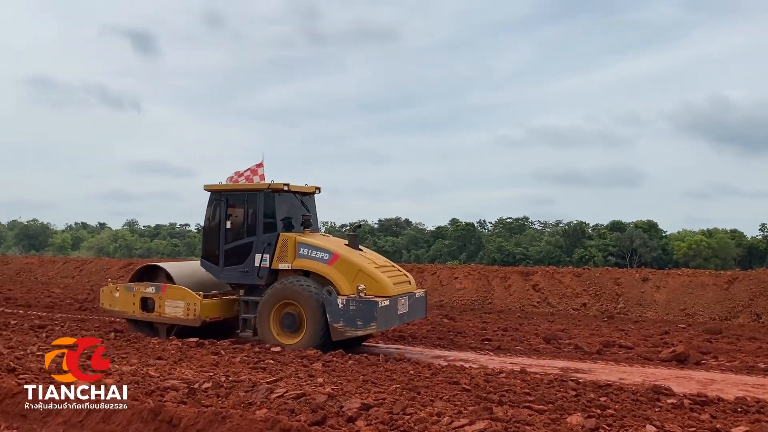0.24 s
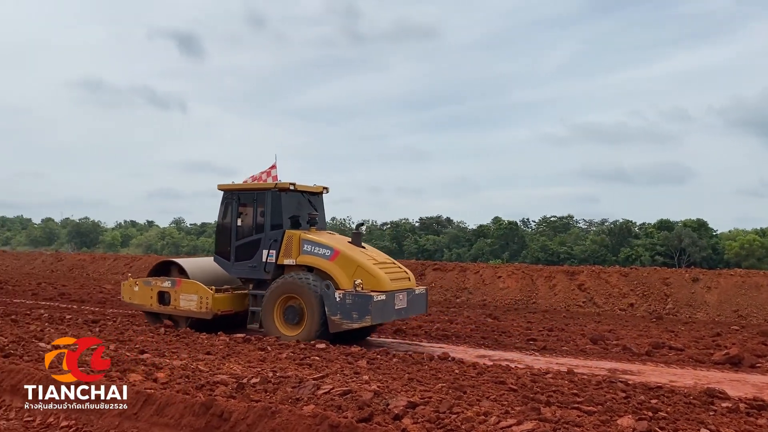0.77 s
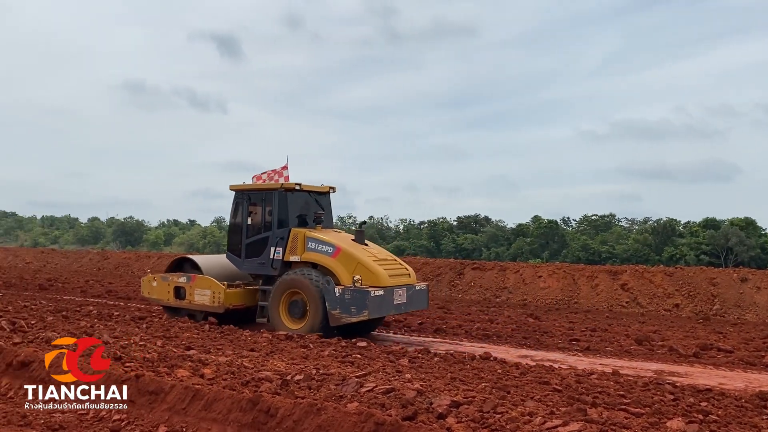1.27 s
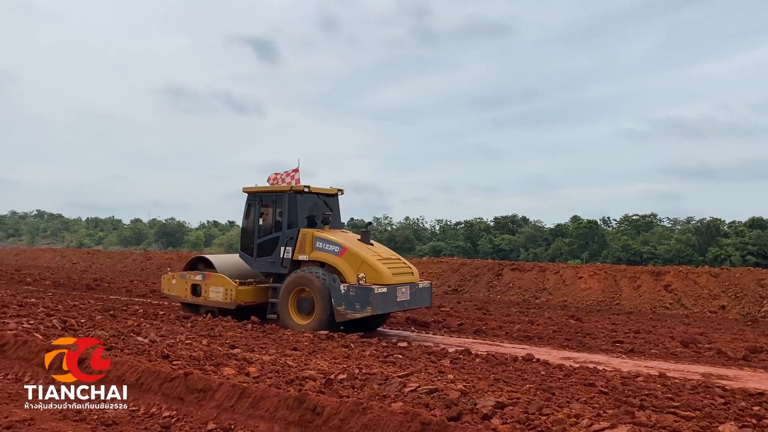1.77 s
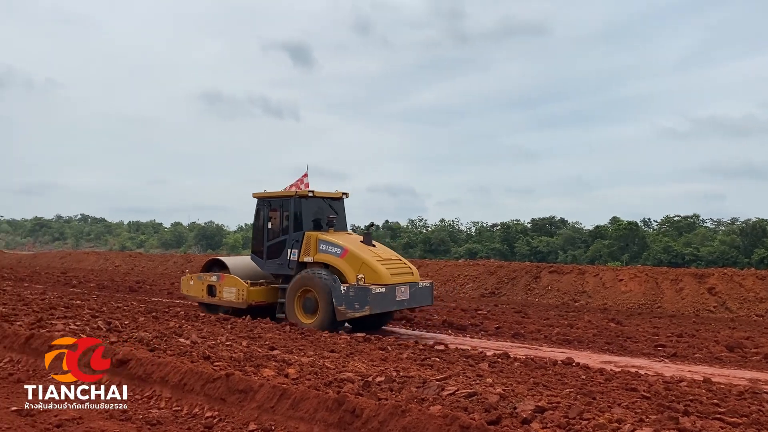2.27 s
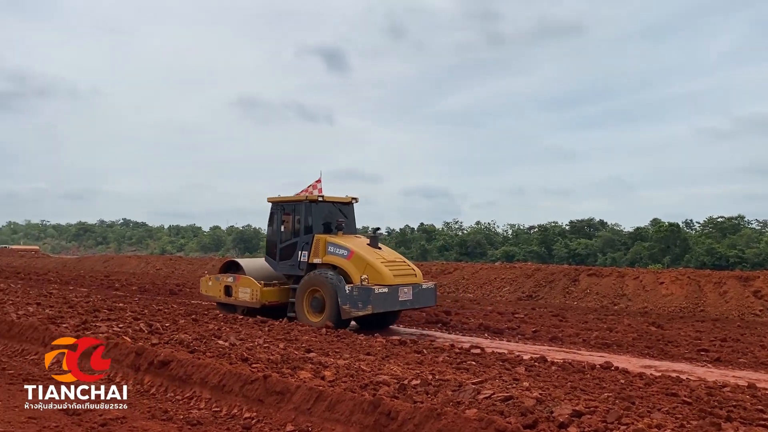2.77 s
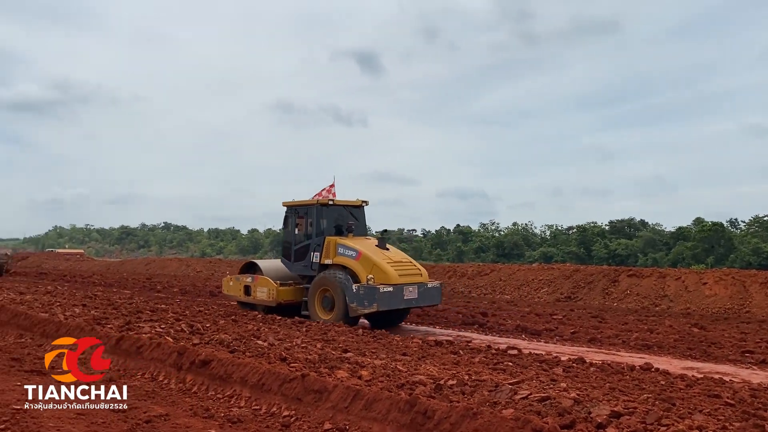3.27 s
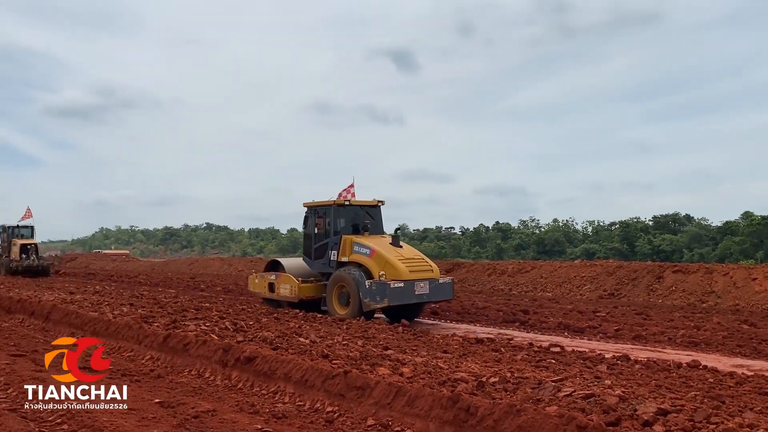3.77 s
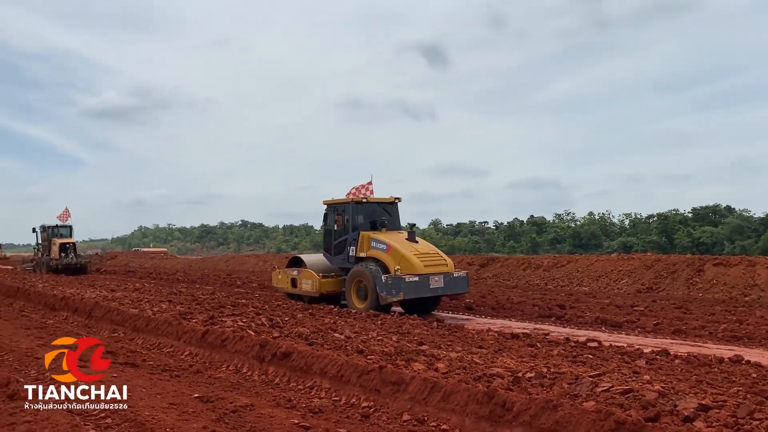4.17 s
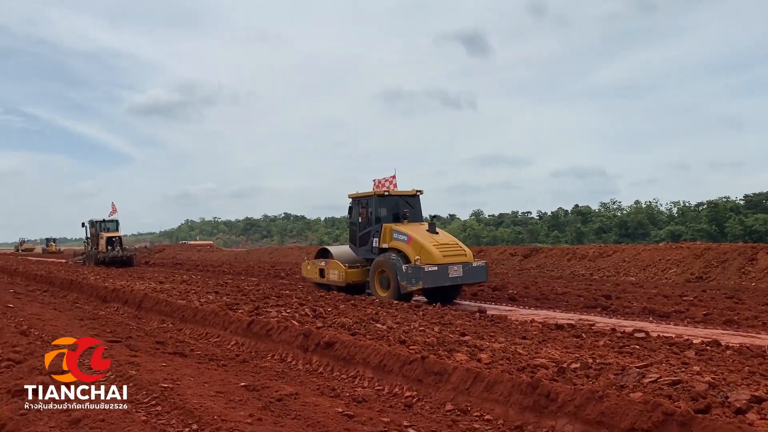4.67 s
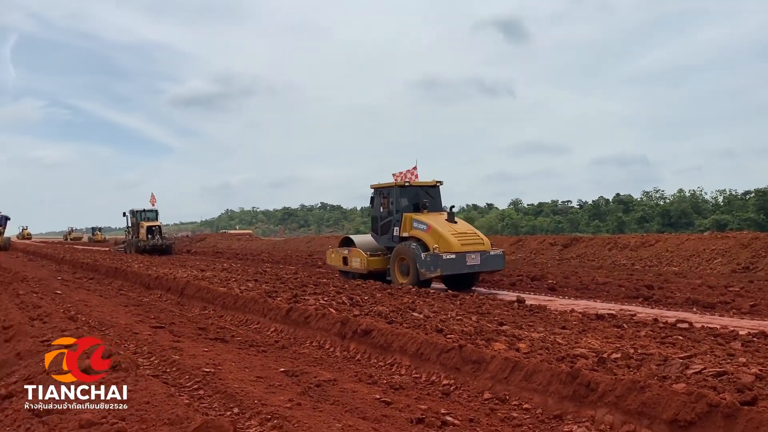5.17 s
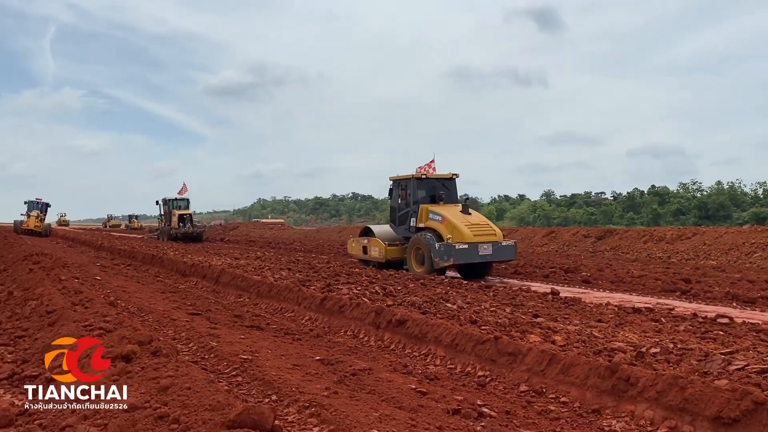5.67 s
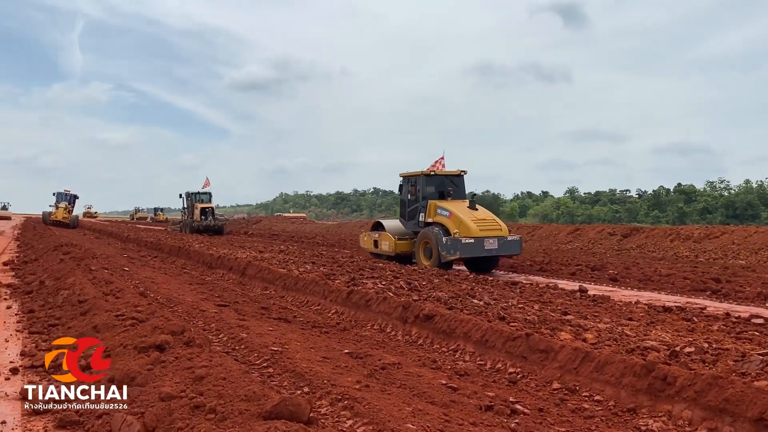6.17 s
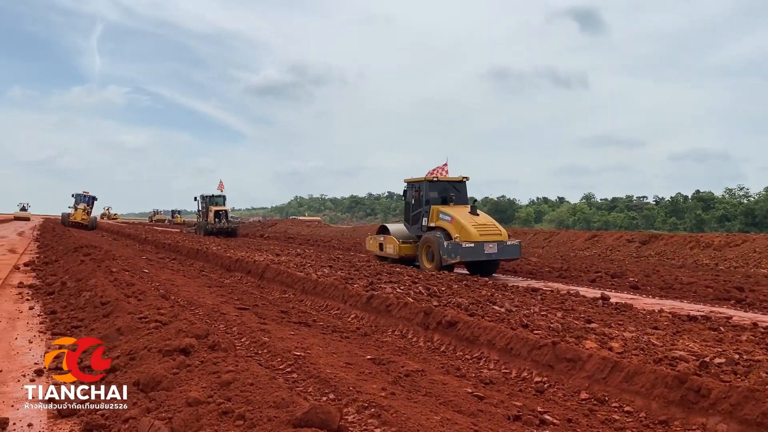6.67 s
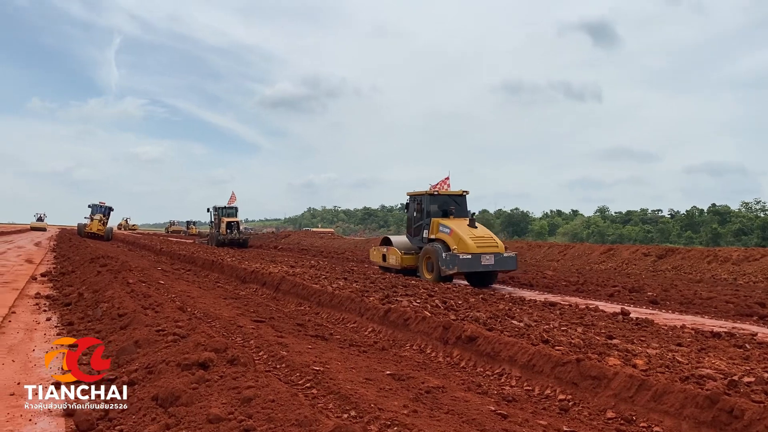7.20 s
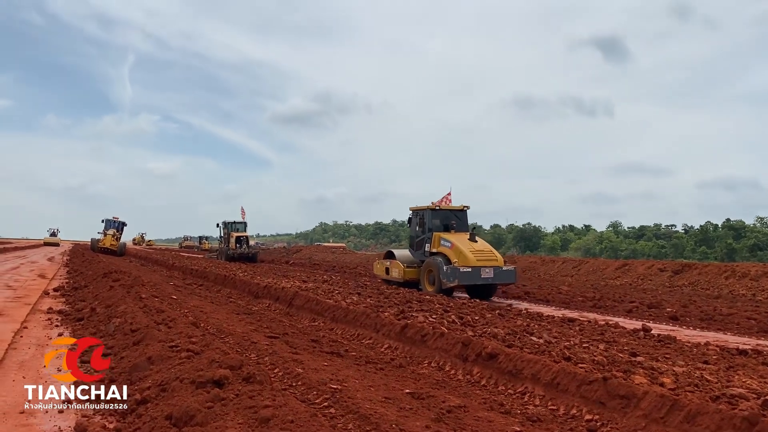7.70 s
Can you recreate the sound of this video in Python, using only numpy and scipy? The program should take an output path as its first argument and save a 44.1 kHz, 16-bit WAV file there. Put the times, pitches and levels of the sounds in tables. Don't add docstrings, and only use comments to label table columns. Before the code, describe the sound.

Steady diesel roar and low drum throb recede across open ground under buffeting wind, with a second roller's beating and metallic rattle growing.

```python
import sys
import numpy as np
from scipy import signal
from scipy.fft import rfft, irfft, next_fast_len
from scipy.io import wavfile
from scipy.ndimage import uniform_filter1d

SR = 44100
rng = np.random.default_rng(int(sys.argv[2]) if len(sys.argv) > 2 else 0)


def rack_gain(trim_db):
    fader = np.asarray(trim_db, float)
    return 10 ** (fader / 20)


def waveform_to_disk(signal):
    frames = np.transpose(np.atleast_2d(signal))
    scaled = np.clip(frames, -1, 1) * 32767
    samples = np.round(scaled).astype(np.int16)
    wavfile.write(sys.argv[1], SR, samples)


N = 350154
T = np.arange(N) / SR


def evened(x):
    return x / np.sqrt(np.mean(x ** 2) + 1e-20)


def read(points, hz):
    f, value = np.transpose(points)
    return np.interp(np.log(hz + 1), np.log(f + 1), value)


def curves(rows):
    s, *columns = np.transpose(rows)
    return [np.interp(T, s, column) for column in columns]


def coloured(x, gain):
    margin = 2048
    size = next_fast_len(len(x) + 2 * margin)
    wide = np.pad(x, (margin, size - len(x) - margin), "reflect")
    filtered = irfft(rfft(wide) * gain(np.fft.rfftfreq(size, 1 / SR)), size)
    return filtered[margin:margin + len(x)]


def hiss():
    return rng.standard_normal(N)


def noise(points):
    return evened(coloured(hiss(), lambda hz: rack_gain(read(points, hz))))


def drift(rate_hz):
    return evened(coloured(hiss(), lambda hz: np.exp(-(hz / rate_hz) ** 2)))


def resonance(hz, centre_hz, width_hz):
    return 1 / (1 + ((hz - centre_hz) / width_hz) ** 2)


def add(mix, s, sound):
    part = mix[round(s * SR):][:len(sound)]
    part += sound[:len(part)]


def turns(hz, waver=0.0006):
    return np.cumsum(hz * (1 + waver * drift(1.54))) / SR


def rotor(turn, orders, level_db, scatter):
    out = np.zeros(N)
    for multiple, db in orders:
        blur = scatter * (1 + 0.07 * multiple)
        path = 1 + blur * (drift(18.0) + 1j * drift(10.6))
        path = path / np.sqrt(1 + 2 * blur ** 2)
        wave = np.exp(2j * np.pi * (multiple * turn + rng.random()))
        out += rack_gain(db) * (path * wave).real
    return np.sqrt(2) * rack_gain(level_db) * out


def patchy(x, depth_db):
    z = signal.stft(x, nperseg=1024, noverlap=768)[2]
    field = rng.standard_normal(z.shape[::-1]).T
    for axis, size in ((0, 9), (1, 14)):
        field = uniform_filter1d(uniform_filter1d(field, size, axis), size, axis)
    return signal.istft(z * rack_gain(depth_db * evened(field)), nperseg=1024, noverlap=768)[1][:N]


def loss_db():
    start_m, speed_m_per_s = 20.7, 1.36
    return -20 * np.log10(1 + speed_m_per_s * T / start_m)


def fading(start_db, share):
    return start_db + share * loss_db()


def shaded():
    turn_s, turn_length_s = 3.45, 0.25
    return 0.5 + 0.5 * np.tanh((T - turn_s) / turn_length_s)


CYLINDERS = [1, -2.3, 0.87, 1.5]
# (frequency [Hz], level [dB per Hz])
ROAR_COLOUR = [(100, -22), (160, -6.5), (250, -13), (400, -8.5), (550, -11), (1200, -14), (2640, -21),
               (4110, -25.5), (4760, -28.5), (5310, -28), (10300, -38), (11000, -39), (11500, -43),
               (12300, -47)]
# (frequency [Hz], width [Hz], level [dB])
HOOD = [(707, 46, -13), (765, 59, -8), (853, 60, -5.5), (1220, 250, -12), (1660, 350, -7), (2970, 450, -14),
        (4270, 160, -10), (5740, 1150, -12)]


def roar_source(crank):
    firing = 2 * crank
    strength = rack_gain(np.take(CYLINDERS, firing.astype(int) % len(CYLINDERS)))
    puffs = strength * np.exp(-(firing % 1) / 0.73)
    drive = hiss() * (1 + 0.05 * evened(puffs - puffs.mean())) * rack_gain(0.53 * drift(19))

    def gain(hz):
        hood = 1 + sum(rack_gain(db) * resonance(hz, f, width / 2) for f, width, db in HOOD)
        notch = 1 - 0.41 * np.exp(-((hz - 4860) / 170) ** 2)
        return rack_gain(read(ROAR_COLOUR, hz)) * hood * notch

    return coloured(drive, gain)


def roar(crank):
    dulling = (0.4, 0.17, 0.24)
    shades_db = (-1.5, -2.5, 0.1)
    vent_db, vent_s, vent_length_s = 1.5, 3.52, 0.42
    tilts_db = []
    for share, shade_db in zip(dulling, shades_db):
        tilts_db.append(share * loss_db() + shade_db * shaded() + 0.14 * drift(4.8))
    tilts_db[2] += vent_db * np.exp(-((T - vent_s) / vent_length_s) ** 2)
    tilts_db = [db - db.mean() for db in tilts_db]
    x = roar_source(crank)
    below = []
    for edge_hz in (1090, 2370, 4400, 7400):
        below.append(coloured(x, lambda hz: np.clip((edge_hz - hz) / 300, 0, 1)))
    bands = below[0], below[2] - below[1], below[3] - below[2]
    out = below[1] - below[0]
    out += sum(band * rack_gain(db) for band, db in zip(bands, tilts_db))
    out += (x - below[3]) * rack_gain(0.31 * tilts_db[2] + 0.8 * drift(9.3))
    return out / np.std(x) * rack_gain(fading(-23, 1.27))


# (multiple of the turning rate, level [dB])
NEAR_DRUM = [(1, -11), (2, 1), (3, -6.5)]


def near_drum():
    return rotor(turns(26.11), NEAR_DRUM, fading(-19, 1.38), scatter=0.05)


# (multiple of the crank rate, level [dB])
ENGINE = [(2, 1), (14, -18), (18, -32), (19.28, -25), (36, -22.5), (63, -29.5)]
# (multiple of the crank rate, level [dB])
EXHAUST = [(4, -7), (6, -12)]


def engine(crank):
    casing = rotor(crank, ENGINE, fading(-23.5, 0.17), scatter=0.15)
    return casing + rotor(crank, EXHAUST, fading(-19, 1.38), scatter=0.68)


# (multiple of the fan rate, level [dB])
FAN = [(1, 1.5), (2, -12)]


def fan():
    level_db = fading(-26.5, 0.11) + 2.2 * drift(2.1)
    return rotor(turns(73.8, 0.003), FAN, level_db, scatter=0.2)


# (multiple of the piston rate, level [dB])
PUMP = [(1, 0)]


def pump():
    level_db = fading(-26.5, 2.2) - 6.5 * shaded()
    return rotor(turns(428.7, 0.001), PUMP, level_db, scatter=0.12 + 0.3 * shaded())


def turbo():
    return rotor(turns(10551), [(1, 0)], -66, scatter=0.6)


# (multiple of the firing rate, level [dB])
FAR_ENGINE = [(1, 0.5), (2, -13)]
# (time [s], firing rate [Hz], level [dB])
FAR = [
    (0, 97.5, -23.5),
    (1.2, 96.16, -27.5),
    (2.1, 96.1, -20.5),
    (3.0, 94.5, -20),
    (3.8, 92.1, -26),
    (4.5, 95.5, -30.5),
    (5.35, 96.5, -23),
    (6.3, 93.5, -36.5),
    (7.94, 93.2, -29.5),
]


def far_engine():
    rate_hz, level_db = curves(FAR)
    return rotor(turns(rate_hz, 0.00324), FAR_ENGINE, level_db + 0.5, scatter=0.33)


# (frequency [Hz], level [dB per Hz])
BUFFET = [(15, -29), (26, -24), (40, 2), (55, -0.5), (80, 5), (150, -3), (300, -14.5), (500, -24.5),
          (900, -66), (2000, -90)]


def buffeting(wind_db):
    level_db = -18 + 1.01 * wind_db
    return noise(BUFFET) * rack_gain(level_db + 2.5 * drift(18))


# (time [s], peak level [dB], pitch [Hz])
THUMPS = [(.351, -4.5, 210), (1.06, -7, 285), (1.145, -15, 224), (1.451, -8.5, 242), (1.787, -8, 245),
          (1.89, -11, 200), (2.014, -7.5, 274), (2.229, -5, 256), (2.291, -5, 229), (2.587, -10.5, 236),
          (2.624, -4, 400), (2.766, -11, 256), (2.868, -6, 226), (2.963, -13, 332), (3.02, -8, 220),
          (3.09, -10, 326), (3.212, -3.5, 225), (3.268, -5, 260), (3.332, -26, 280), (3.542, -9, 234),
          (3.828, -12, 200), (3.988, -9.5, 205), (4.123, -4.5, 280), (4.391, -17, 190), (4.45, -6, 252.6),
          (4.547, -4, 230), (7.295, -4, 235), (7.467, -5, 297), (7.692, -10, 430), (7.735, -12, 200)]


def thumps(wind_db):
    eddies_per_s, eddy_db, low_hz, high_hz = 4, -13.5, 190, 353
    cycles = 1.12
    when, size, pitch = rng.random((int(eddies_per_s * N / SR), 3)).T
    at = (when * (N - 1)).astype(int)
    small_db = eddy_db + wind_db[at] - 1.7 * size
    small = np.transpose([at / SR, small_db, low_hz + (high_hz - low_hz) * pitch])
    out = np.zeros(N)
    for s, db, hz in [*THUMPS, *small]:
        u = np.arange(int(3 * cycles / hz * SR)) / SR * hz / cycles
        swing = np.sin(2 * np.pi * (cycles * (u - 0.071 * u ** 2) + rng.random()))
        add(out, s, rack_gain(db) * np.exp(-((u - 1.2) / 0.6) ** 2) * swing)
    return out


# (frequency [Hz], level [dB per Hz])
WAKE = [(50, -42), (110, 6), (220, -5.5), (450, -9.5), (700, -24), (1500, -80)]


def wake(eddies):
    keep = np.exp(-1 / (0.021 * SR))
    swell = signal.lfilter([1 - keep], [1, -keep], abs(eddies))
    return rack_gain(5) * swell * noise(WAKE)


# (time [s], length [s], level [dB])
GUSTS = [(0, 0.19, -31), (5.634, .03, -33), (5.698, 0.016, -29), (5.754, 0.12, -28), (7.134, 0.05, -29.5),
         (7.282, 0.062, -26), (7.334, 0.08, -24), (7.463, 0.022, -33), (7.537, 0.036, -26),
         (7.587, 0.035, -26), (7.645, 0.053, -24), (7.846, 0.043, -26.5), (7.91, 0.029, -27)]


def gusts():
    out = np.zeros(N)
    for s, length_s, db in GUSTS:
        add(out, s, rack_gain(db) * signal.windows.tukey(int(length_s * SR), 0.4))
    return out


# (frequency [Hz], level [dB per Hz])
RUMBLE = [(20, -16), (50, -7), (100, 5), (200, -5), (300, -10), (500, -33), (1000, -90)]
# (frequency [Hz], level [dB per Hz])
FLUTTER = [(60, -50), (120, -25), (250, 0), (500, -2.5), (900, -14), (1300, -26), (1600, -39), (2000, -90)]


def port_wind(wind_db, gust):
    rumble_db = -31.5 + 0.95 * wind_db + 0.82 * drift(4.2)
    flutter_db = -43.5 + 0.9 * wind_db + 2.5 * drift(25)
    steady = noise(RUMBLE) * rack_gain(rumble_db) + noise(FLUTTER) * rack_gain(flutter_db)
    lumps = noise(RUMBLE) + 0.92 * noise(FLUTTER) * rack_gain(4.7 * drift(60))
    return steady + gust * lumps


# (time [s], level [dB])
WIND = [(0, -10), (.6, -8.5), (1.05, 0.5), (1.5, -7.5), (1.8, 1), (2.4, -3.5), (3.0, 3), (3.4, -0.5),
        (3.7, -3), (4.15, 3), (4.6, -4.5), (4.8, -6.5), (5.4, -11), (5.8, -6), (6.0, -5), (6.4, -5.5),
        (7.2, -2.5), (7.94, -2.5)]


def wind():
    wind_db = curves(WIND)[0]
    gust = gusts()
    eddies = thumps(wind_db)
    common = buffeting(wind_db) + eddies + wake(eddies)
    return common, port_wind(wind_db, gust), gust


# (multiple of the turning rate, level [dB])
SECOND_DRUM = [(2, -0.5), (3, -12.5)]
# (time [s], level [dB])
NEARING = [
    (0, -18),
    (1.4, -20),
    (2.6, -7),
    (4.3, -3),
    (5.2, 0),
    (7.94, 0),
]


def second_drum(turn):
    start_turns = 0.92
    out = rotor(turn + start_turns, SECOND_DRUM, -19.5 + curves(NEARING)[0], scatter=0.028)
    return out + rotor(turn, [(1, 0)], -32, scatter=0.06)


# (time [s], level [dB])
SHAKE = [
    (0, -26),
    (4.3, -7.5),
    (5.1, -9),
    (5.45, 0.5),
    (6.15, -3),
    (6.5, 1),
    (6.7, -0.5),
    (7.2, 2),
    (7.6, -6),
    (7.94, 1),
]


def rattle(turn):
    shake_db = curves(SHAKE)[0]
    swing = 2 * turn
    knocks = (0.6 + np.exp(-(swing % 1) / 0.4)) * rack_gain(2.5 * np.cos(np.pi * swing / 2))
    panel = coloured(hiss() * knocks * rack_gain(0.47 * drift(13)), lambda hz: resonance(hz, 3955, 130))
    flecks = coloured(hiss() * knocks * rack_gain(4.1 * drift(22.9)), lambda hz: resonance(hz, 4330, 170))
    core = coloured(hiss(), lambda hz: resonance(hz, 3977, 28))
    chatter = rack_gain(-41 + shake_db) * (evened(panel) + 0.39 * evened(flecks))
    return chatter + rack_gain(-44.5 + 1.05 * shake_db) * evened(core)


def gears(crank):
    start_s, end_s, idle_db, loaded_db, slope_db_per_s = 2.8, 3.45, -58, -39, -1.7
    level_db = np.interp(T, [start_s, end_s], [idle_db, loaded_db])
    level_db += slope_db_per_s * np.maximum(T - end_s, 0)
    fuzz = evened(coloured(hiss(), lambda hz: resonance(hz, 1310, 40)))
    return rotor(crank, [(40, -11)], level_db, scatter=0.4) + rack_gain(level_db + 2.5) * fuzz


# (time [s], peak level [dB], pitch [Hz])
PINGS = [
    (3.4194, -29.5, 4254),
    (3.8706, -30, 4150),
    (5.7994, -43, 4140),
    (6.5204, -31, 4133),
    (6.5505, -30, 4360),
    (6.6296, -41, 4270),
    (6.949, -37, 4170),
    (7.3901, -36, 4310),
    (7.5797, -35, 4260),
    (7.8994, -35, 4150),
]


def pings():
    out = np.zeros(N)
    t = np.arange(int(0.03 * SR)) / SR
    shape = (1 - np.exp(-t / 0.002)) * np.exp(-t / 0.015)
    for s, db, hz in PINGS:
        add(out, s, rack_gain(db + 1.0) * shape * np.sin(2 * np.pi * hz * t))
    return out


def machines():
    crank, second = turns(32.575), turns(31.05)
    near = patchy(roar(crank), depth_db=0.03) + near_drum() + engine(crank) + fan() + pump() + gears(crank)
    return near + far_engine() + second_drum(second) + rattle(second) + pings()


def ducked(x, gust):
    low_hz, high_hz, half_db = 330, 1150, -25
    push = (uniform_filter1d(gust, size=500) / rack_gain(half_db)) ** 3
    band = coloured(x, lambda hz: np.clip((hz - low_hz) / 100, 0, 1) * np.clip((high_hz - hz) / 300, 0, 1))
    return x - band * push / (1 + push)


# (frequency [Hz], share)
LEAD = [(80, -0.0047), (300, -0.099), (620, -0.18), (1200, 0.081), (1950, .01), (2450, 0.34), (3000, 0.4),
        (3700, 0.18), (4350, 0.32), (4700, 1), (5200, 0), (5900, 0.3), (9000, 1.16), (12000, 1.3)]
# (frequency [Hz], share)
SIDE_OF = [(500, 0.0033), (780, 0.088), (1100, 0), (2500, -0.0056), (3000, -0.08), (4300, -.11),
           (4800, -0.42), (5100, 0.014)]


def port_difference(mid):
    return coloured(mid, lambda hz: 1j * read(LEAD, hz) + read(SIDE_OF, hz))


# (frequency [Hz], level [dB per Hz])
APART = [(500, -30), (900, -2), (1400, -32.5), (1650, -6), (1900, -16), (2100, -5), (2500, 1), (3100, -8),
         (3600, -10), (4800, 1.5), (5250, -8), (7000, -17), (11000, -11), (16000, -12)]


def diffuse():
    return patchy(noise(APART), depth_db=2.0) * rack_gain(fading(-41, 0.41))


def scene():
    common, apart, gust = wind()
    mid = ducked(machines(), gust) + common
    side = port_difference(mid) + apart + diffuse() + turbo()
    mid = np.tanh(mid / 1.4) * 1.4
    mid = coloured(mid, lambda hz: np.clip((12450 - hz) / 300, 0, 1))
    return np.array([mid + side, mid - side])


def band_limit(x):
    return signal.sosfilt(signal.butter(12, 15750, fs=SR, output="sos"), x)


def record(dry):
    mix = dry * signal.windows.tukey(N, 0.0029 * SR / N)
    return band_limit(mix)


dry = scene()
out = record(dry)
waveform_to_disk(out)
```